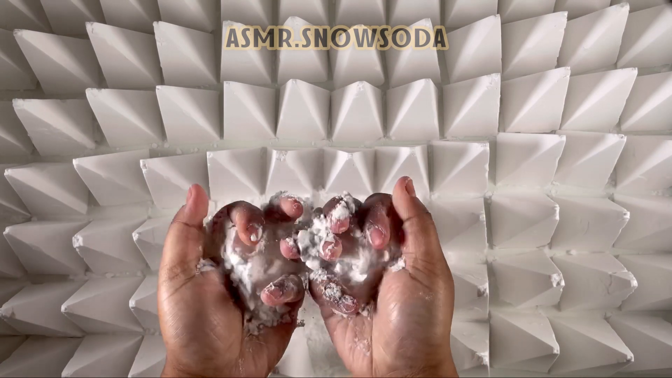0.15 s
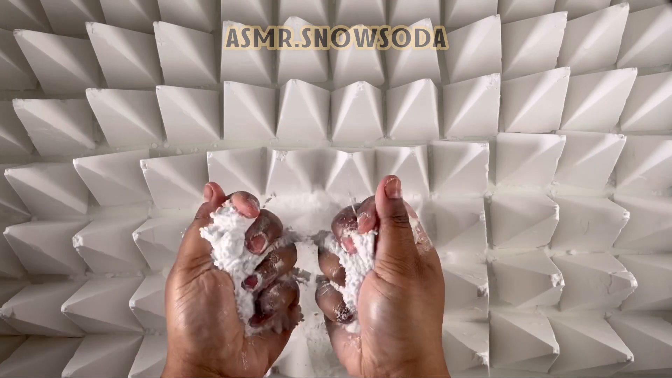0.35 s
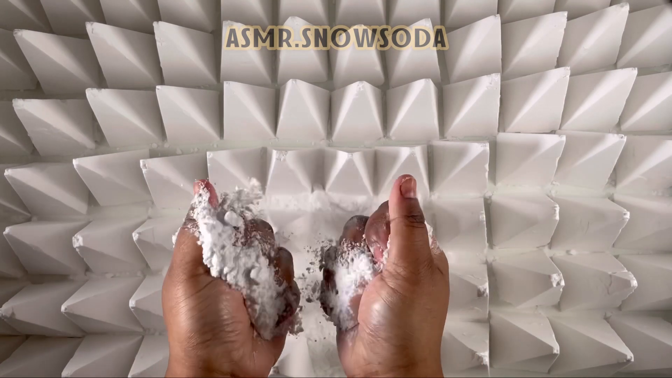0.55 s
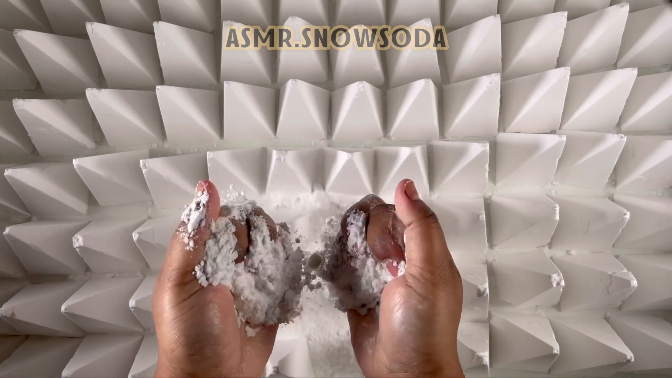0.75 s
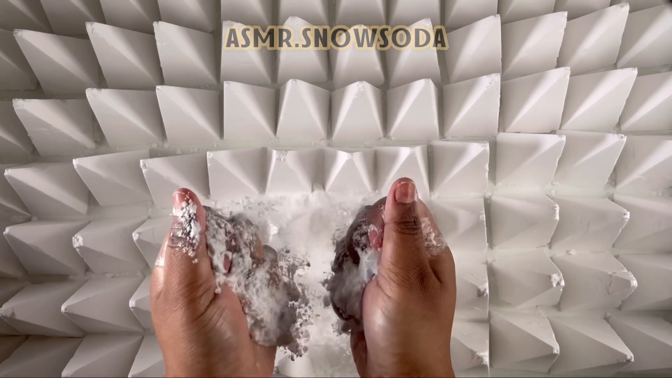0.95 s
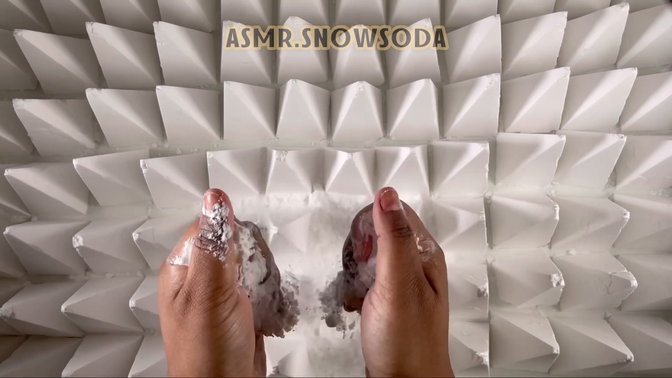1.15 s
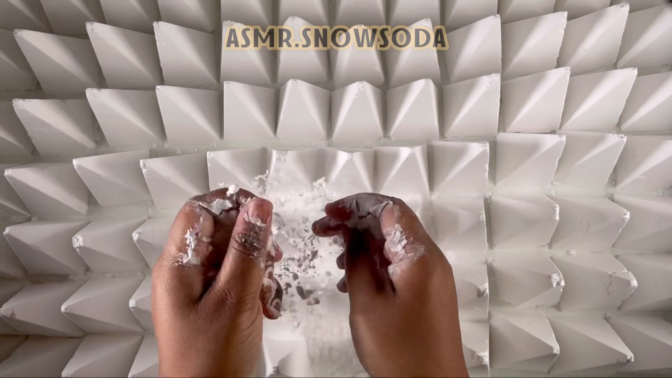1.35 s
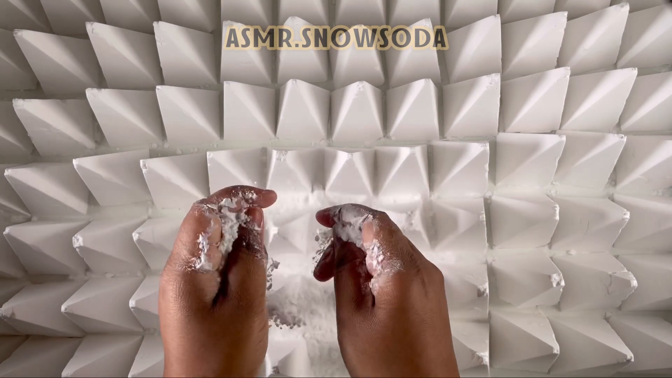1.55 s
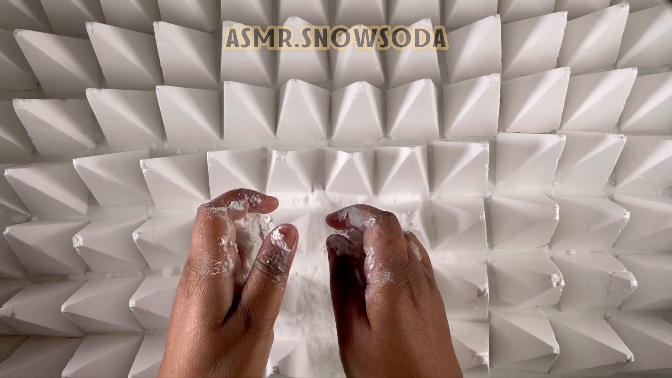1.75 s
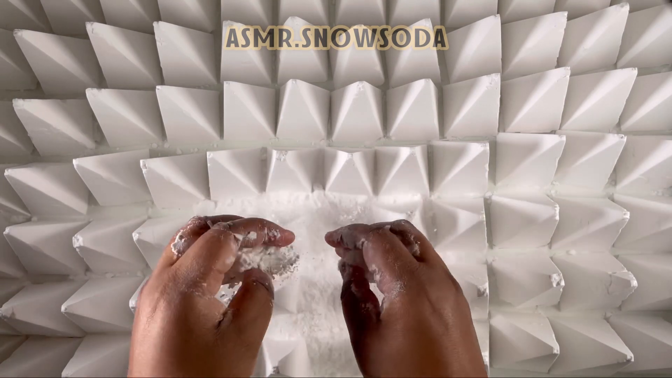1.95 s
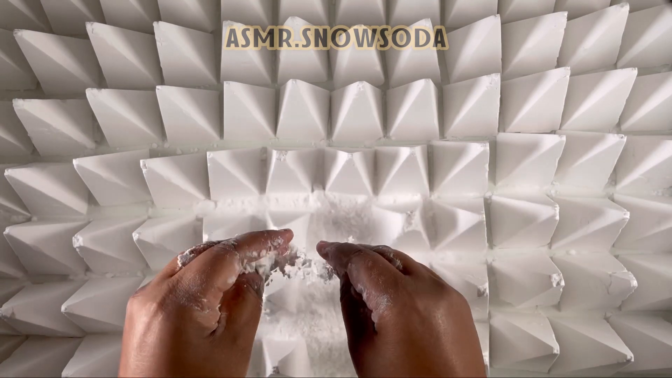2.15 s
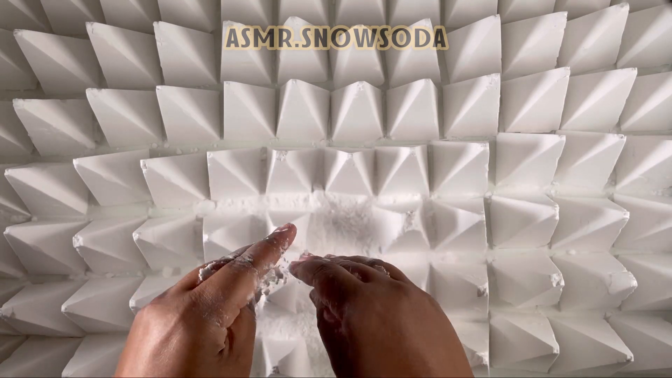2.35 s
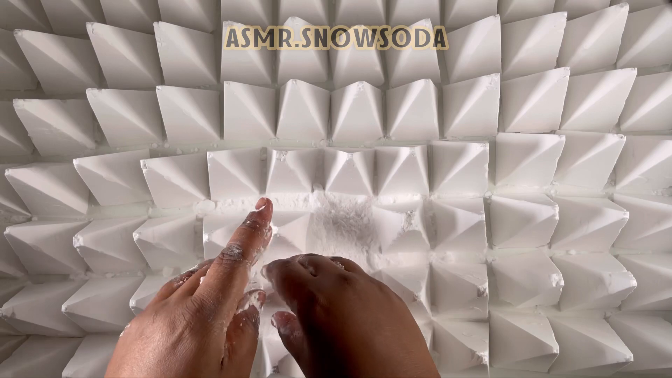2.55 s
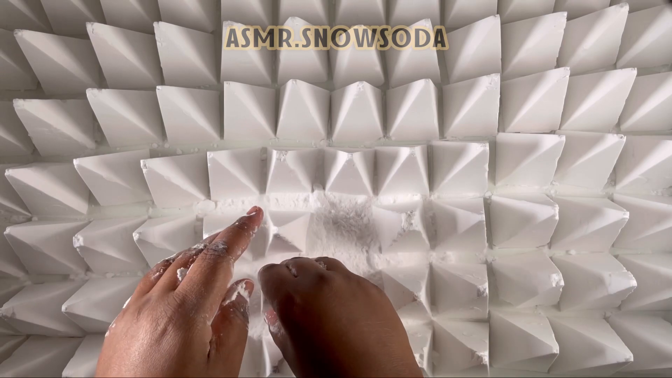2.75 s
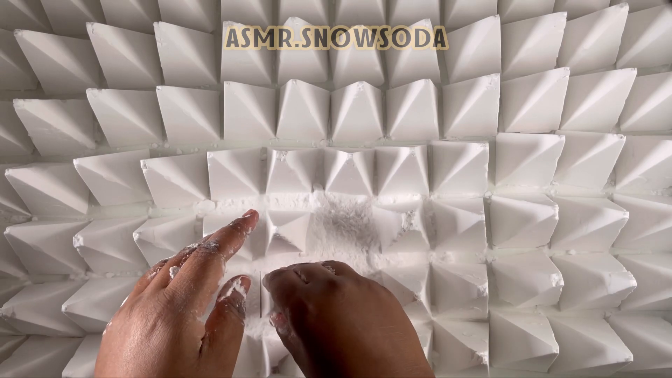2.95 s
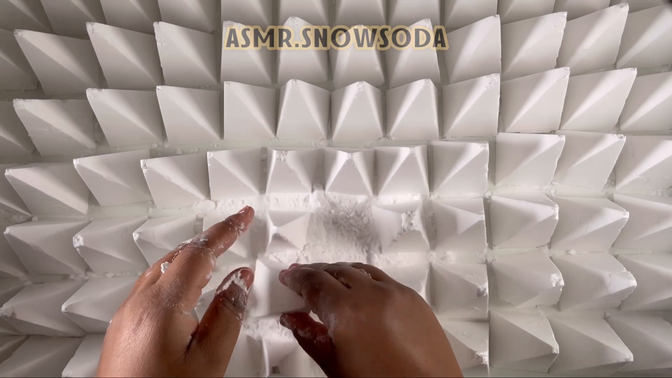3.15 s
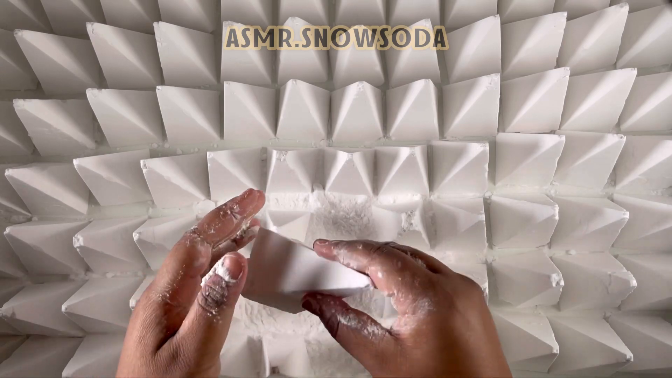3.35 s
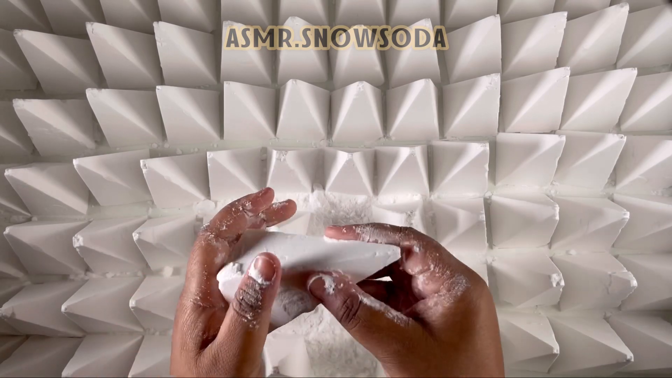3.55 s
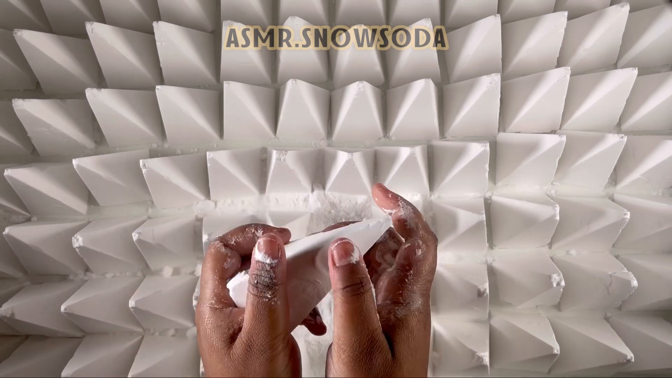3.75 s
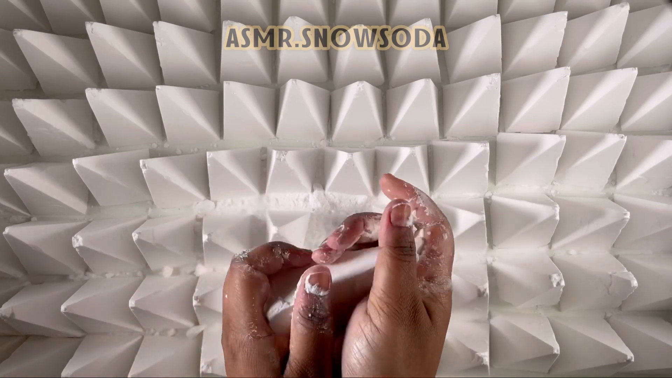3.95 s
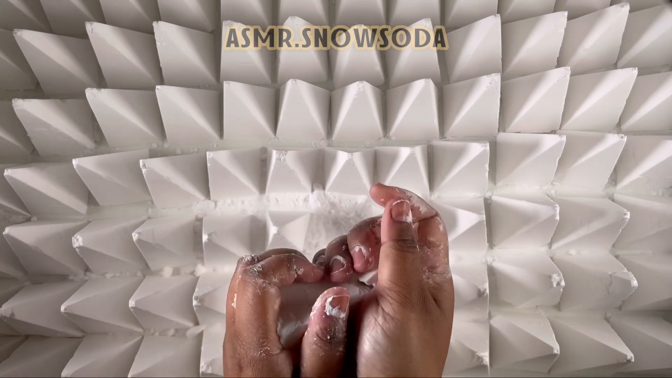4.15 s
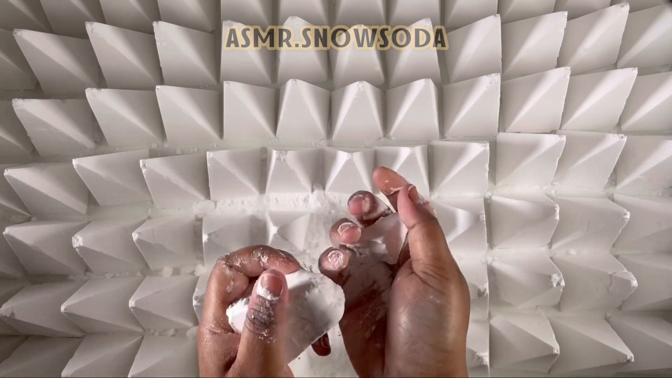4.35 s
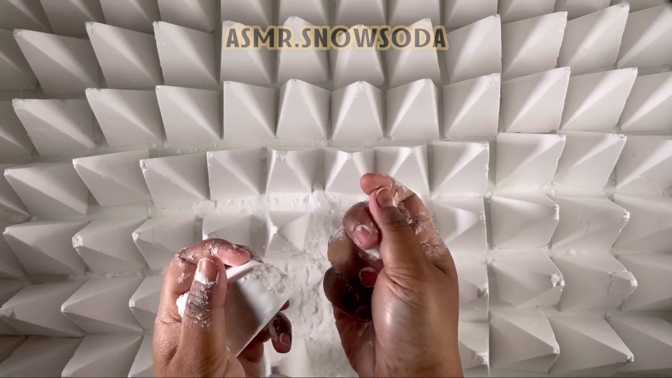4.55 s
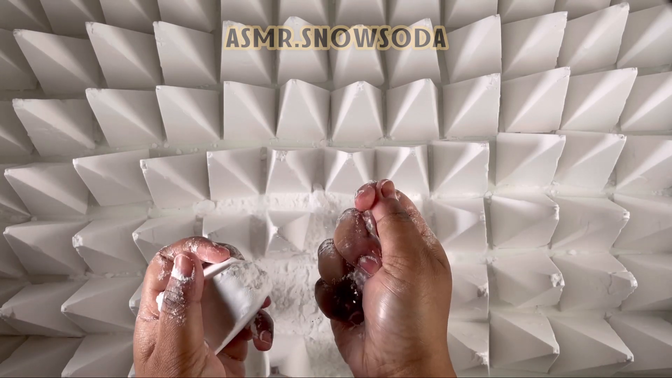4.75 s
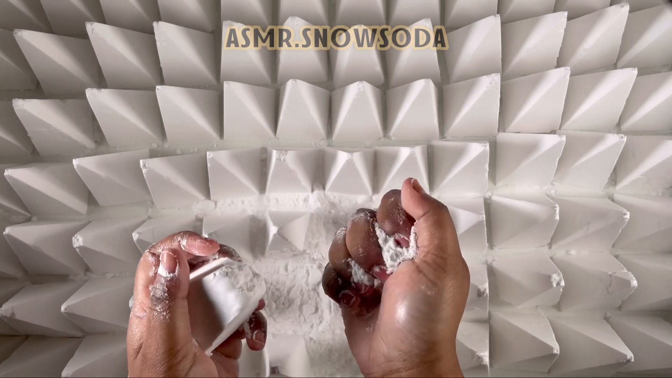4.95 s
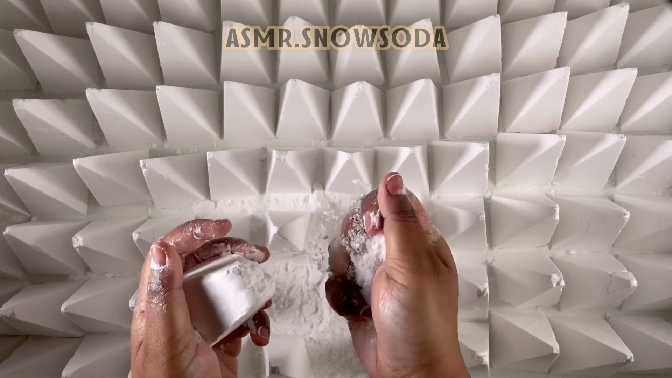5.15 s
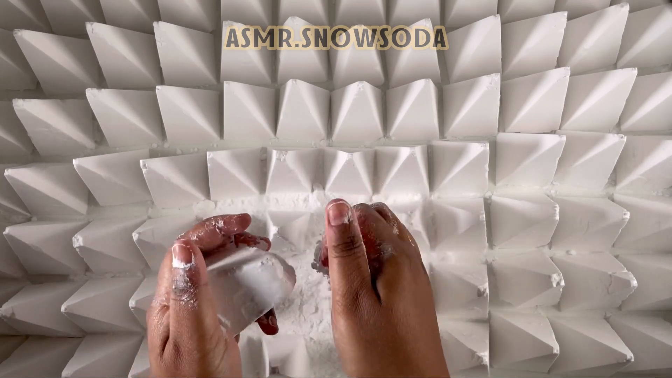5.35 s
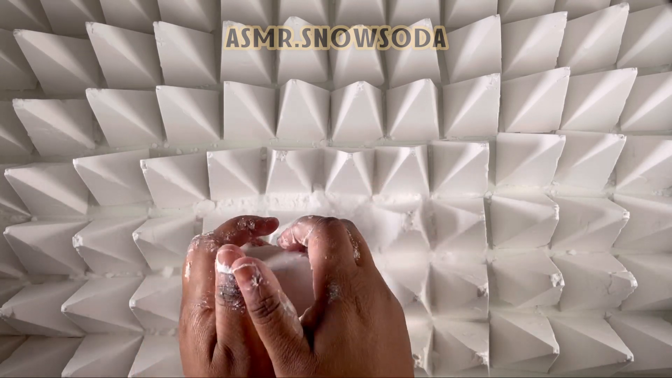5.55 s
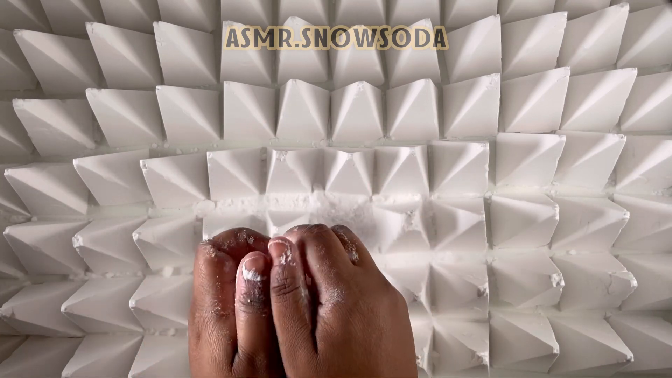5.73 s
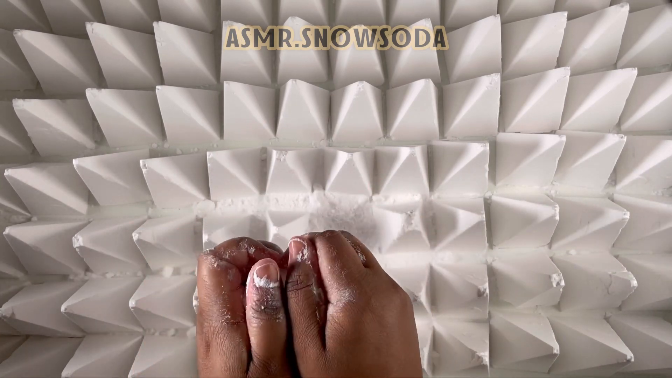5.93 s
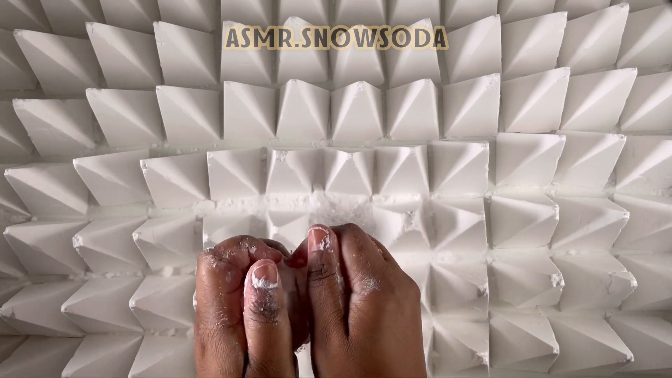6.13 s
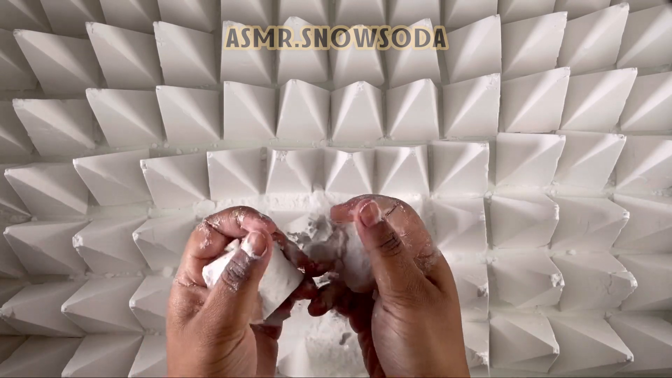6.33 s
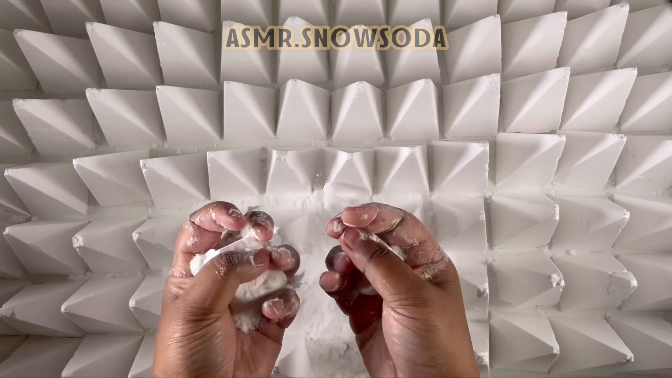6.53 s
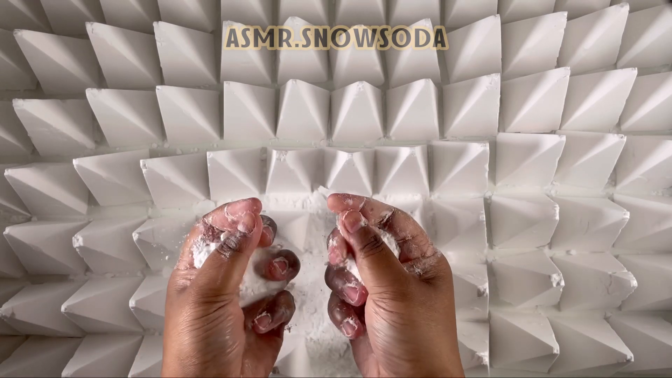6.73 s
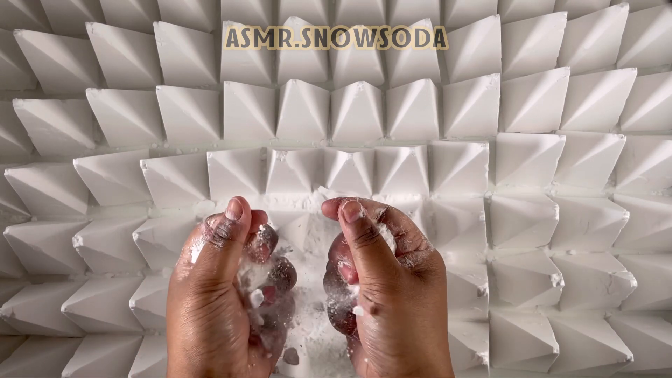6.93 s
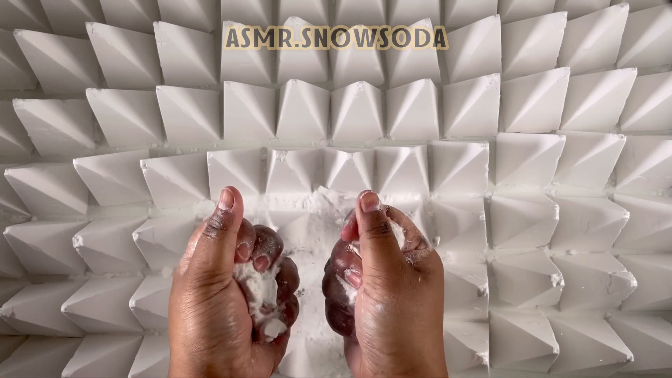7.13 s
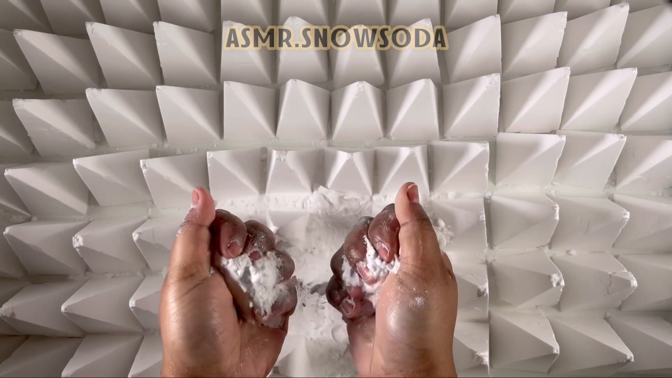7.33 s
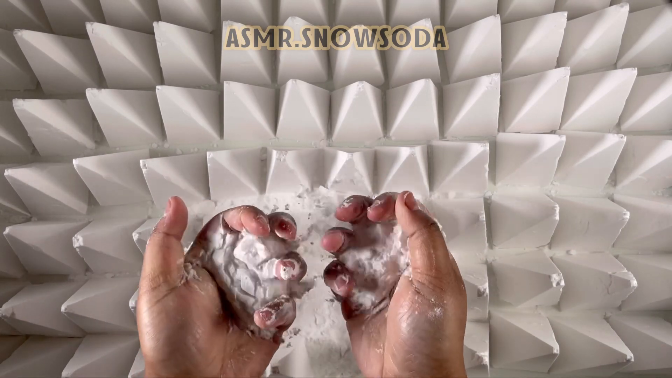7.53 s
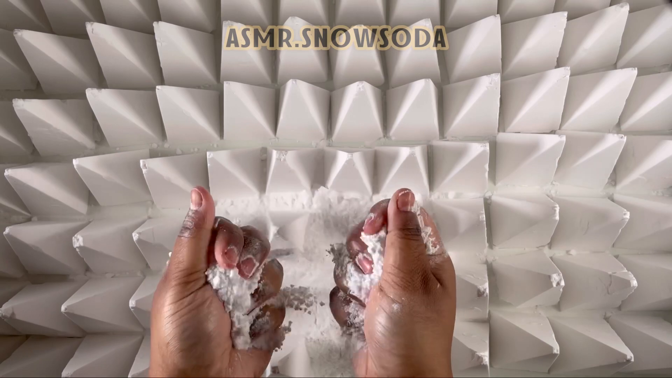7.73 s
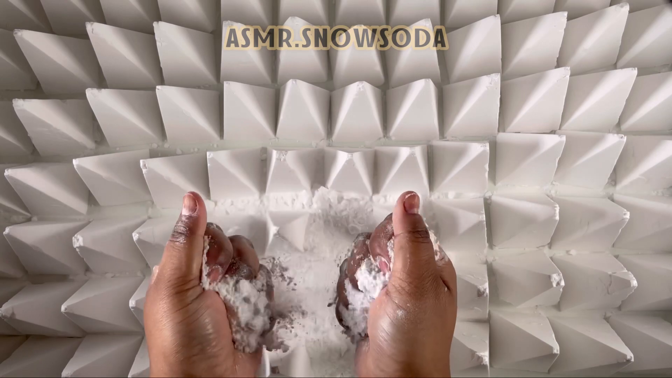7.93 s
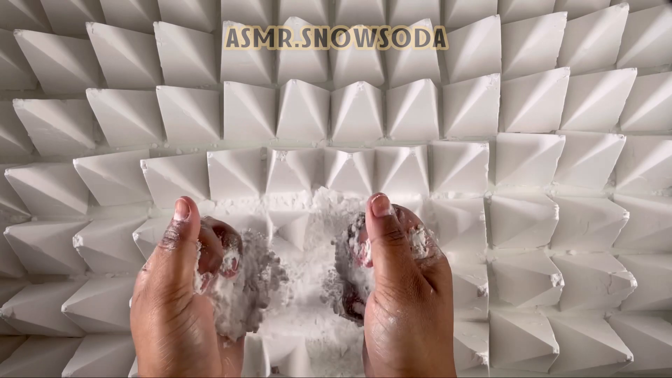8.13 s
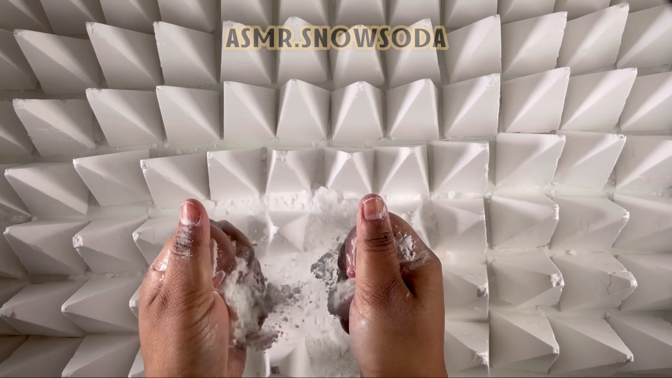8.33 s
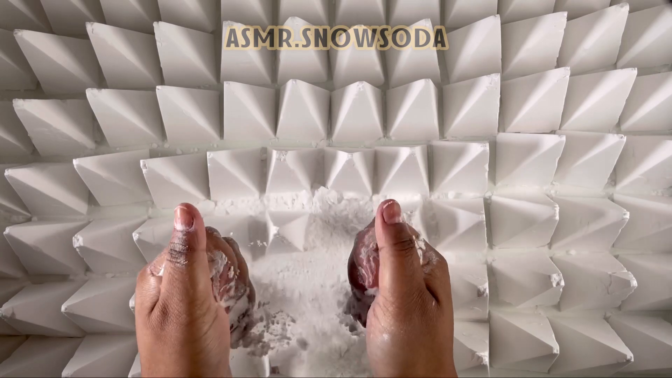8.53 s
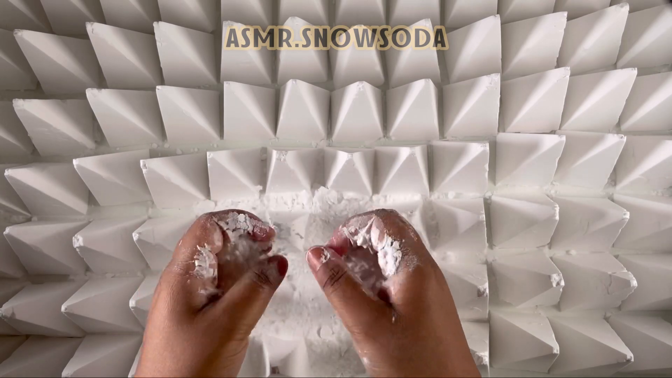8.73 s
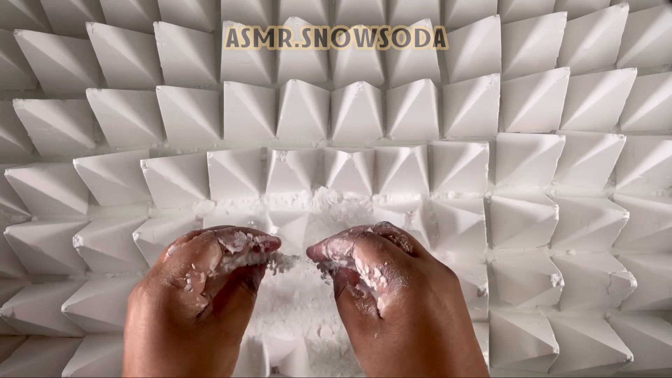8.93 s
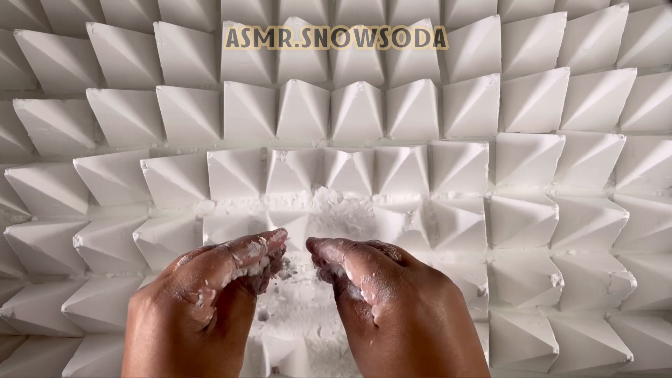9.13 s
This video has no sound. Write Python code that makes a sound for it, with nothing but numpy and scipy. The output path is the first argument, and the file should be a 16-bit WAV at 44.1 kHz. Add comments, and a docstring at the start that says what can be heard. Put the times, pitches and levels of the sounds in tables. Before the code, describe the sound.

Hands crush blocks of pressed powder close up, sharp crunchy cracks in bursts with soft gritty crumbling and fine powdery hiss in a quiet room.

```python
"""Two hands crush blocks of pressed powder close to a mono microphone in a quiet room with hum and rumble.
At first lumps crack in quick bursts: each is a short pressure dip, with smaller breaks and grit after it.
From 2 to 4 s cracks are rare; filtered random grains hiss as powder, and resonances ring in stroked blocks.
Cracks return near 4 s, crowd together from 6.5 to 7.3 s and thin out by 8.8 s; clumped small breaks make
crumbling in the fists throughout. Hiss and crumbling close the scene; nearby surfaces echo these sounds."""
import sys
import numpy as np
from scipy import signal
from scipy.fft import rfft, irfft
from scipy.io import wavfile

SR = 44100
rng = np.random.default_rng(int(sys.argv[2]) if len(sys.argv) > 2 else 0)


def wrap_up_sound(samples):
    """Save the sound to the file named by the first command line argument, as 16-bit audio."""
    columns = np.atleast_2d(samples).T
    # keep every value between -1 and 1, then stretch to whole-number steps
    tamed = np.clip(columns, -1, 1)
    steps = np.round(tamed * 32767).astype(np.int16)
    wavfile.write(sys.argv[1], SR, steps)


N = 409248


def from_db(db):
    """Gain of a level in dB."""
    return 10 ** (np.asarray(db) / 20)


def rms_one(x):
    """Scale x to an average strength (rms) of 1."""
    return x / np.sqrt(np.mean(x ** 2) + 1e-20)


def drift(rate):
    """Slow random wandering that changes about rate times a second; spread 1."""
    step = 40    # samples; slow changes need few points
    r = np.exp(-2 * np.pi * rate * step / SR)
    noise = rng.standard_normal(N // step + 2002)
    slow = signal.lfilter([1], [1, -2 * r, r * r], noise)[2000:]    # skip the filter's start
    return np.interp(np.arange(N) / step, np.arange(len(slow)), rms_one(slow))


def coloured(x, spectrum):
    """Shape x by a spectrum of (f/Hz, level/dB per Hz), joined along log pitch; rms 1."""
    hz, db = np.transpose(spectrum)
    log_hz = np.log(np.fft.rfftfreq(N, 1 / SR) + 1)
    gain = from_db(np.interp(log_hz, np.log(hz), db))
    return rms_one(irfft(rfft(x) * gain, N))


def band(x, low_hz, high_hz):
    """Keep the pitches between two limits; rms 1."""
    return rms_one(signal.sosfilt(signal.butter(2, [low_hz, high_hz], "band", fs=SR, output="sos"), x))


def resonance(x, hz, width_hz):
    """Ring at one pitch, longer when the width is narrow; gain 1 at the peak."""
    r, w = np.exp(-np.pi * width_hz / SR), 2 * np.pi * hz / SR
    return signal.lfilter(np.array([1, 0, -1]) * (1 - r * r) / 2, [1, -2 * r * np.cos(w), r * r], x)


def grains(per_s, spread_db):
    """Random clicks of either sign, mostly small and a few large."""
    sizes = from_db(spread_db * np.minimum(rng.exponential(1, N), 5)) * rng.choice([-1, 1], N)
    return sizes * (rng.random(N) < per_s / SR)


def dip(hz, cycles):
    """One break: the pressure dips, swings back and is damped within a few cycles; depth 1."""
    turns = np.arange(int(6 * SR / hz)) * hz / SR
    shape = -np.sin(2 * np.pi * turns) * turns * from_db(-60 * turns / cycles)
    return shape / np.max(np.abs(shape))


def swings(rows, hz, cycles):
    """One damped swing for each row of (t/s at its start, level/dB at its peak)."""
    clicks = np.zeros(N)
    start, peak_db = np.transpose(rows)
    clicks[(start * SR).astype(int)] = from_db(peak_db)
    return signal.fftconvolve(clicks, dip(hz, cycles))[:N]


def gestures(start, length, level_db, swell_db, rise, fall, rest_db, tail_db=-100, fade=0):
    """Each gesture rises up to its start, holds with a swell or sag, then falls; gives dB per sample."""
    t = np.arange(0, N / SR + .002, .002)[:, None]    # a point every 2 ms
    since_end = np.maximum(t - start - length, 0)
    swell = swell_db * np.clip((t - start) / (length + .001), 0, 1)
    before = -rise * np.maximum(start - t, 0)
    after = np.maximum(-fall * since_end, tail_db - fade * since_end)    # a fading tail outlasts the fall
    power = np.sum(from_db(level_db + swell + before + after) ** 2, axis=1)    # powers add
    power += from_db(rest_db) ** 2
    return np.interp(np.arange(N) / SR, t[:, 0], 10 * np.log10(power))


# colour of the faint room noise: f/Hz, level/dB per Hz (only the shape counts)
ROOM_SPECTRUM = [(44, -63.5), (80, -0.5), (350, -21), (629, -19.5), (984, -22), (1260, -25.5), (15800, -52)]


def room_noise():
    """Faint broad noise, stronger toward the bass."""
    level_db = -55.5
    return from_db(level_db) * coloured(rng.standard_normal(N), ROOM_SPECTRUM)


# loudness of the rumble over time: t/s, level/dB
RUMBLE_LEVEL = [(0.0, -45.5), (0.36, -40.5), (2.64, -54), (2.79, -39.5), (3.26, -42), (4.5, -50.5),
                (9.28, -45)]


def rumble():
    """A slow rumble: very low noise that grows and shrinks."""
    t, level_db = np.transpose(RUMBLE_LEVEL)
    level_db = np.interp(np.arange(N) / SR, t, level_db)
    return from_db(level_db) * band(rng.standard_normal(N + SR), 7.0, 24.9)[SR:]


def hum():
    """A low hum: narrow noise mixed with a tone whose pitch wavers."""
    centre_hz, width_hz, level_db = 57.7, 3.9, -47.5
    narrow = rms_one(resonance(rng.standard_normal(N + SR), centre_hz, width_hz)[SR:])
    pitch_hz = centre_hz + 2.343 * drift(2.887)
    tone = np.sin(2 * np.pi * np.cumsum(pitch_hz) / SR)
    return from_db(level_db) * rms_one(narrow + 3.5 * tone)


def background():
    """Hum, rumble and faint noise lie beneath everything."""
    return hum() + rumble() + room_noise()


# hands bumping the table: t/s at the start, level/dB at the peak
TABLE_BUMPS = [(0.239, -33.5), (.397, -27.5), (3.035, -33.5), (3.062, -35), (6.006, -24), (7.087, -24),
               (7.592, -37), (7.88, -39)]


def bumps():
    """The table gives a dull low swing when the hands bump it."""
    return swings(TABLE_BUMPS, hz=110.4, cycles=4.8)


# echoes from near surfaces: delay t/s, gain (negative: the soft powder bed inverts it), top f/Hz
SURFACES = [(.00217, -0.35, 2200), (.0045, -.15, 2000)]


def near_echoes(x):
    """Near surfaces send the sound back delayed and dulled."""
    out = x.copy()
    for delay_s, gain, top_hz in SURFACES:
        late = np.interp(np.arange(N) - delay_s * SR, np.arange(N), x)
        out += gain * signal.lfilter(*signal.butter(1, top_hz, fs=SR), late)
    return out


# colour of fine rubbing powder: f/Hz, level/dB per Hz (only the shape counts)
POWDER_SPECTRUM = [(2000, -32), (3500, -15), (4200, -8), (6300, -5), (7200, -1), (9000, -3), (10500, -4),
                   (15800, -2)]


def fine_hiss(rubbing):
    """Clicks of rubbing grains take on the bright colour of fine powder; rms 1."""
    return coloured(rubbing, POWDER_SPECTRUM)


# fingers sliding over a whole block: t/s at the start, length t/s, scrape level/dB,
# ring level/dB over the scrape, best excited pitch f/Hz
FINGER_SLIDES = [(2.455, 0.037, -50.5, -6, 6800), (2.7, 0.033, -51.5, -6, 4030),
                 (3.074, 0.047, -62, 4, 4200), (3.201, 0.025, -56, 1, 8240), (3.226, 0.01, -48.5, 1, 8300),
                 (3.55, 0.15, -58.5, 4.5, 4200), (3.838, 0.122, -49.5, 1.5, 4240),
                 (4.142, 0.14, -52, 8, 1640), (4.4, 0.029, -51, -3, 8700)]
# pitches at which a block rings: f/Hz, width f/Hz, relative level/dB
BLOCK_MODES = [(1700, 350, 0), (3200, 110, 2), (4150, 120, 0), (4880, 130, -1), (6230, 200, 0),
               (7500, 600, -3), (8400, 220, 0), (9800, 240, 0)]


def stroked_block():
    """A sliding finger scrapes and the block rings; the grip damps modes far from the best pitch."""
    start, length, scrape_db, ring_db, best_hz = np.transpose(FINGER_SLIDES)
    edges = 1196, 1196    # rise and fall, dB per second
    rubbing = grains(9000, spread_db=2.5)
    out = fine_hiss(rubbing) * from_db(gestures(start, length, scrape_db, 0, *edges, -120))
    for hz, width_hz, mode_db in BLOCK_MODES:
        held_db = scrape_db + ring_db + mode_db - 10 * np.log2(hz / best_hz) ** 2
        sliding_db = gestures(start, length, held_db, 0, *edges, -120)
        ring = rms_one(resonance(rubbing, hz, width_hz))
        out += ring * from_db(sliding_db + 1.5 * drift(12)) / 2
    return out


def slips(per_s, fade_s):
    """The powder gives way in small slips that start at once and die out; spread 1."""
    jolts = np.minimum(rng.exponential(1, N), 2) * (rng.random(N) < per_s / SR)
    dying = signal.lfilter([1], [1, -np.exp(-1 / (fade_s * SR))], jolts)
    return rms_one(dying - dying.mean())


def patchy_hiss():
    """Fine grains hiss, and bands of the hiss come and go on their own; rms 1."""
    fine = fine_hiss(grains(8000, spread_db=1.56))
    patches = np.zeros(N)
    for hz in np.geomspace(3200, 14500, 10):
        patches += resonance(fine, hz, width_hz=0.36 * hz) * from_db(3.0 * drift(6))
    return rms_one(fine + from_db(3.0) * rms_one(patches))


# fingers rubbing powder, a row a stroke: t/s at the start, length t/s, hiss level/dB,
# swell over the stroke level/dB, coarse rubbing level/dB over the hiss
RUB_STROKES = [(0.0, 0.12, -39.5, -3, -2), (0.189, 0.25, -49, 9, -1.5), (0.474, 0.27, -42, 4, -3),
               (0.865, 0.08, -35.5, -8.5, -11), (0.95, 0.31, -44, -5.5, -4.5),
               (1.339, 0.19, -41.5, -4.5, -9), (1.53, 0.22, -49, 3.5, -3.2), (1.54, 0.045, -46, 6.5, -11),
               (1.773, 0.069, -57, 7.5, -7.5), (1.94, 0.1, -56.5, 14.5, -5.5), (2, 0.26, -56, 12, -7),
               (2.262, 0.22, -49, -4, -6.0), (2.723, 0.053, -55, -7.3, -0.5),
               (2.827, 0.2, -61.5, 5.5, -3.2), (3.076, 0.031, -53.5, 4, -7), (3.362, 0.007, -54.5, 0, -2),
               (3.427, 0.15, -64.5, 10, -22), (3.57, 0.11, -45, -1.5, -13.5), (3.764, 0.13, -43, -15, -10),
               (3.893, 0.18, -40.5, -1.5, -4), (4.118, 0.15, -48, 4, -2), (4.497, 0.49, -36.5, -12, -1.3),
               (4.817, 0.21, -49, 9.5, -6.5), (5.091, 0.093, -42, 4, -8.5), (5.196, 0.13, -49.5, 7, -5),
               (5.57, 0.026, -42, -0.5, -5), (5.664, 0.24, -45, 3, -5), (6.037, 0.021, -46, 5.5, 0.5),
               (6.125, 0.23, -46, -1.5, -3.5), (6.377, 0.14, -47.5, 12, -6), (6.574, 0.34, -43, 4.2, 1.5),
               (6.984, 0.29, -41.5, 0, -0.5), (7.296, 0.12, -45, 2.5, -5), (7.626, 0.48, -44.5, 4, -4),
               (8.176, 0.13, -46.5, -6.5, -6.5), (8.321, 0.15, -44.5, 3, -5.5),
               (8.528, 0.13, -41.5, -10.5, -7.5), (8.716, 0.033, -47.5, 0, -6.5), (8.877, 0.16, -55, 6, -5),
               (9.09, 0.14, -43.5, 8, -8.5)]


def powder(shower_db):
    """Grains rub and trickle: a fine patchy hiss, a coarser rub below, and the scrape of a stroked block."""
    start, length, level_db, swell_db, rough_db = np.transpose(RUB_STROKES)
    rise, fall, still_db = 289, 270, -68    # dB per second, dB per second, dB
    # after a stroke loose grains trickle on, this far below it and fading slowly
    trickle_db, trickle_fade = -7.5, 75    # dB, dB per second
    shape = rise, fall, still_db, trickle_db, trickle_fade
    hiss_db = gestures(start, length, level_db, swell_db, *shape)
    coarse_db = gestures(start, length, level_db + rough_db, swell_db, *shape)
    grit_in_shower_db = -7
    coarse = band(grains(3000, spread_db=0.5), 1240, 5370) * from_db(1.0 * drift(14))
    coarse *= np.hypot(from_db(coarse_db), from_db(shower_db + grit_in_shower_db))
    flutter_db = 0.75 * drift(58) + 1.25 * slips(per_s=25, fade_s=0.022)
    return (patchy_hiss() * from_db(hiss_db) + coarse + stroked_block()) * from_db(flutter_db)


def shower():
    """Every crack is followed by a dying shower of fragments; dB per sample."""
    below_peak_db, t60_s = -26.5, 0.069    # t60: time to fade by 60 dB
    start, peak_db = np.transpose([row[:2] for row in LUMP_CRACKS])
    return gestures(start + 0.0025, 0, peak_db + below_peak_db, 0, 5000, 60 / t60_s, -120)


# squeezes of the fists that break crumbs: t/s at the start, length t/s, crumbling level/dB
FIST_SQUEEZES = [(0, 0.16, -50.5), (0.373, 0.073, -36), (0.563, 0.33, -44.5), (0.824, 0.29, -45),
                 (1.07, 0.2, -47), (1.33, 0.14, -49), (1.545, 0.084, -43.5), (1.71, 0.26, -51.5),
                 (2.018, 0.021, -45.5), (2.137, 0.2, -48.5), (2.936, 0.13, -52), (4.01, 0.067, -50),
                 (4.608, 0.054, -37.5), (4.81, 0.21, -52.5), (5.17, 0.042, -47), (5.39, 0.11, -47),
                 (5.738, 0.25, -46), (6.045, 0.017, -35.5), (6.502, 0.18, -42.5), (6.72, 0.3, -37),
                 (7.13, 0.0083, -33.5), (7.352, 0.1, -47), (7.603, 0.095, -42.5), (7.77, 0.065, -38.0),
                 (7.87, 0.36, -48), (8.414, 0.072, -45), (8.544, 0.48, -51), (9.065, 0.3, -45)]


def crumbling(shower_db):
    """Crumbs break while the fists squeeze and in the showers; dB per sample."""
    rise, fall, idle_db = 170, 140, -72    # dB per second, dB per second, dB
    squeezing_db = gestures(*np.transpose(FIST_SQUEEZES), 0, rise, fall, idle_db)
    return 10 * np.log10(from_db(squeezing_db) ** 2 + from_db(shower_db) ** 2)


def crumbs(crumbling_db):
    """Small breaks of every size come in clumps; harder crumbling breaks off smaller, brighter chips."""
    clicks = np.abs(grains(800 * from_db(4.5 * drift(25)), spread_db=2.2))
    pitches_hz, dealt = np.geomspace(220, 3500, 10), rng.integers(0, 10, N)
    slope = 0.22 + 0.058 * (crumbling_db + 49)    # how much high pitches are favoured
    out = np.zeros(N)
    for k, hz in enumerate(pitches_hz):
        breaks = signal.fftconvolve(clicks * (dealt == k), dip(hz, cycles=2.3))[:N]
        out += breaks * (hz / 600) ** slope * from_db(-4 * (hz / 2000) ** 2)
    return from_db(crumbling_db) * rms_one(out)


# whole blocks snapping in two: t/s at the start, level/dB of the dull swing before the bass cut
BLOCK_SNAPS = [(3.9882, -24), (4.2675, -32), (6.0084, -7)]


def snaps():
    """A block snaps with a push of air: upward pressure in a dull swing with a sharp edge."""
    dull = swings(BLOCK_SNAPS, hz=370, cycles=2.2)
    edge = swings(BLOCK_SNAPS, hz=1500, cycles=2.2)
    return -dull - from_db(-3) * edge


# hollows between the blocks below: f/Hz, width f/Hz, level/dB
HOLLOWS = [(300, 110, -11), (566, 68, -5.5), (685, 110, -10), (1780, 420, -10)]


def with_hollows(x):
    """Hollows in the bed of blocks ring along with each break."""
    return x + sum(from_db(db) * resonance(x, hz, width_hz) for hz, width_hz, db in HOLLOWS)


# lumps cracking: t/s at the deepest point, peak level/dB before bass cut and hollows, base pitch f/Hz,
# and for big lumps the thump level/dB over the crack
LUMP_CRACKS = [(0.0295, -23.5, 1740), (0.0708, -19, 2700), (0.243, -20.5, 1000, -10), (0.3248, -17, 1800),
               (0.336, -25, 1300, -5), (0.3444, -18, 1350, -1), (0.3669, -21, 1650),
               (0.3722, -16, 1050, -2), (0.3903, -10.5, 1150), (0.401, -16.5, 990, 0), (0.4167, -10, 1370),
               (0.4407, -24, 1130), (0.4592, -22.5, 820, -11), (0.4624, -21, 1300), (0.4751, -25, 1900),
               (0.4873, -25, 1360), (0.5058, -19.5, 1130), (0.589, -14, 1530), (0.6208, -26, 1760),
               (0.8208, -22.5, 1520, -8), (0.836, -17.5, 1400), (1.038, -23.5, 1060), (1.0839, -27, 1720),
               (1.246, -26.5, 670), (1.3964, -19, 1750), (1.4705, -29.5, 1100, 0), (1.5251, -27.5, 600, 3),
               (1.5378, -27.5, 520, 3), (2.0292, -27, 810, -9), (2.9472, -36, 800),
               (3.044, -49.5, 525, 15.5), (3.9962, -24, 2080), (4.0575, -20, 1800, -8), (4.0605, -19, 2900),
               (4.4871, -24, 1770), (4.492, -19.5, 950, -10), (4.5106, -23, 1800), (4.5224, -16.5, 1380),
               (4.561, -13.5, 2040), (4.572, -14.5, 960), (4.6053, -19.5, 1250, -11), (4.6373, -16.5, 820),
               (4.659, -9, 1440, -10), (4.6632, -10.5, 1520), (4.665, -14, 1700), (4.6906, -5, 1780),
               (5.1791, -25, 950, -3), (5.1862, -24, 1020, -10), (5.7362, -25, 2190), (5.809, -18.5, 2010),
               (5.837, -25, 1700), (5.846, -14, 2390), (5.8655, -11.5, 1960), (6.0111, -6, 1700),
               (6.0242, -20, 1490, -5), (6.06, -22, 1500), (6.074, -15, 3200), (6.098, -20, 940),
               (6.1078, -26, 1400), (6.1148, -22, 770), (6.1252, -22, 1600), (6.5278, -24, 2140),
               (6.613, -15, 1560, -8), (6.6646, -15, 2900), (6.6822, -16, 2460), (6.69, -19, 855, 4),
               (6.7052, -8.5, 1260, -6.5), (6.7335, -20, 2200), (6.7408, -10, 2130), (6.7673, -7, 1360),
               (6.7795, -19, 1500), (6.7912, -12, 1400), (6.7955, -15, 1400), (6.81, -13, 1390),
               (6.8181, -20, 2000), (6.8354, -17, 1390), (6.8405, -15, 3500), (6.843, -14, 3140),
               (6.8519, -5, 1160), (6.8775, -10, 1700), (6.8795, -6, 1980), (6.9145, -10, 2300),
               (6.9276, -18, 1090), (6.9362, -9.5, 910, -4), (6.9772, -15, 1300), (6.98, -4.5, 1100),
               (6.9958, -7, 1560), (7.0026, -15, 1800), (7.0207, -17, 1220, -4), (7.0772, -19, 875),
               (7.084, -16, 870), (7.0907, -5.5, 754, -2), (7.1086, -4.5, 1980), (7.1143, -8, 1110),
               (7.1285, -15, 1300, -9), (7.1582, -12, 1120), (7.1998, -18, 1310), (7.2073, -22, 1160),
               (7.278, -16.5, 1860), (7.672, -27, 736, -9), (7.7973, -15, 1490),
               (7.8009, -13.5, 1440, -8.5), (7.8111, -17, 1370, -8), (7.8432, -20, 1460),
               (7.8855, -18, 2030), (8.271, -36, 500, 3), (8.2934, -36, 600, 3), (8.314, -26, 1570),
               (8.4309, -26, 1290), (8.4558, -10, 1260), (8.829, -34, 600, 0)]


def cracks():
    """A sharp break, a dull thump of a big lump giving way, then smaller breaks and grit dying out."""
    break_up_t60_s, thump_hz = 0.017, 360
    out = np.zeros(N + SR)
    chance = rng.random((len(LUMP_CRACKS), 3, 8))    # eight smaller breaks each
    grit = band(rng.standard_normal(N + SR), 2200, 10200)
    t = np.arange(int(break_up_t60_s * SR)) / SR
    for (deepest_s, peak_db, hz, *thump), (lag, octave, size) in zip(LUMP_CRACKS, chance):
        # each break: delay in s, pitch in Hz, level in dB, cycles until damped
        breaks = [(0, 1.183 * hz, peak_db, 1.26)]
        breaks += [(0, thump_hz, peak_db + over_db, 0.98) for over_db in thump]
        lag_s = 0.00052 + 0.012 * lag ** 1.614    # most follow at once
        later_hz = hz * 2 ** (1.7 * octave - .45)
        later_db = peak_db - 5 - 10 * size - 60 * lag_s / break_up_t60_s
        breaks += zip(lag_s, later_hz, later_db, 2.5 + 2.0 * size)    # small chips ring longer
        start = int((deepest_s - 0.15 / hz) * SR)
        for after_s, break_hz, level_db, cycles in breaks:
            shape, at = dip(break_hz, cycles), start + int(after_s * SR)
            out[at:at + len(shape)] += from_db(level_db) * shape
        grit_db = peak_db - 24 + 5 * np.log2(hz / 1500)    # brighter breaks throw more grit
        span = slice(start, start + len(t))
        out[span] += from_db(grit_db - 60 * t / break_up_t60_s) * grit[span]
    return out[:N]


def scene():
    """Breaks and powder echo nearby; bumps and background join; one microphone feeds both channels."""
    shower_db = shower()
    breaking = cracks() + crumbs(crumbling(shower_db)) + snaps()
    # small sources radiate little bass
    breaking = signal.lfilter(*signal.butter(3, 150, "high", fs=SR), breaking)
    close_sounds = near_echoes(with_hollows(breaking) + powder(shower_db))
    return np.tile(close_sounds + bumps() + background(), (2, 1))


def record(dry):
    """The highest peaks are rounded under a ceiling, then the top is cut."""
    ceiling, cutoff_hz = .63, 16000    # from the cutoff up, all is at least 65 dB down
    rounded = dry / (1 + (dry / ceiling) ** 4) ** .25
    return signal.sosfilt(signal.cheby2(24, 65, cutoff_hz, fs=SR, output="sos"), rounded)


dry = scene()
out = record(dry)
wrap_up_sound(out)
```